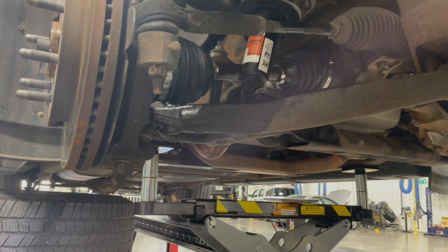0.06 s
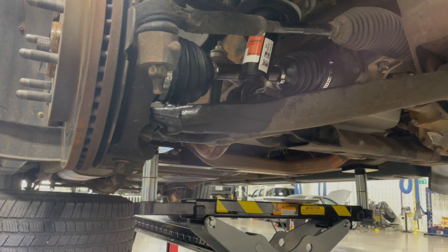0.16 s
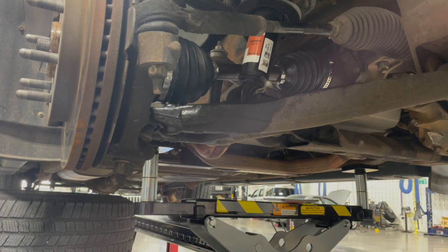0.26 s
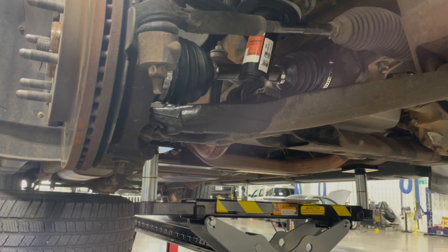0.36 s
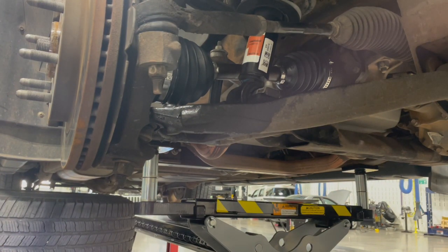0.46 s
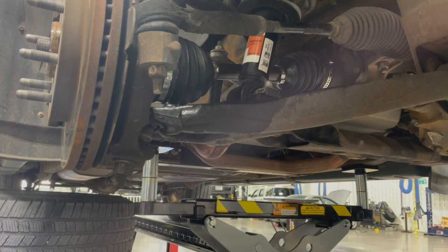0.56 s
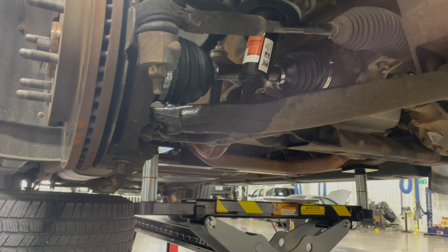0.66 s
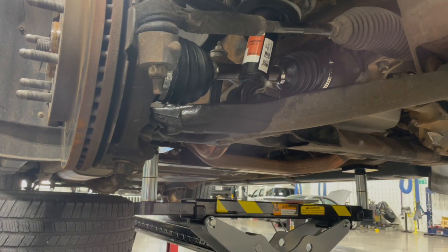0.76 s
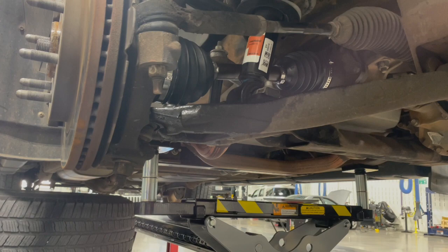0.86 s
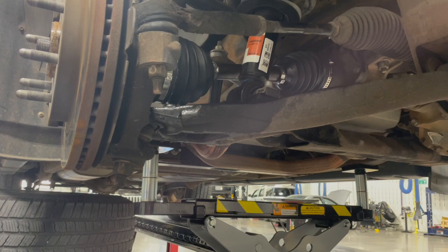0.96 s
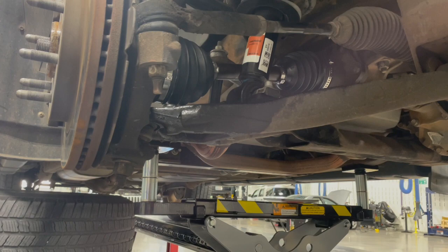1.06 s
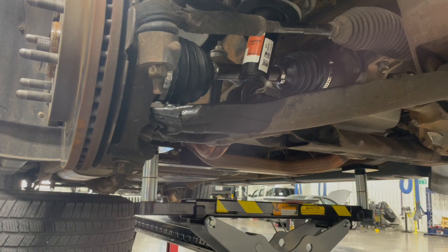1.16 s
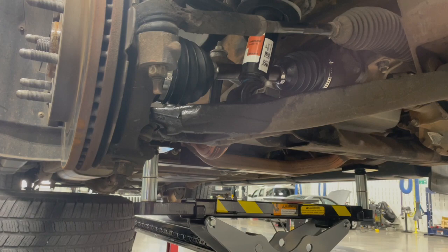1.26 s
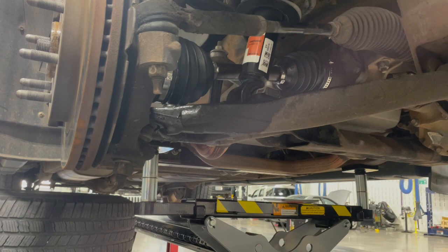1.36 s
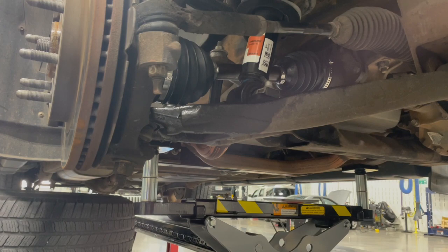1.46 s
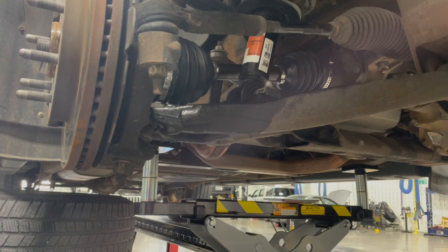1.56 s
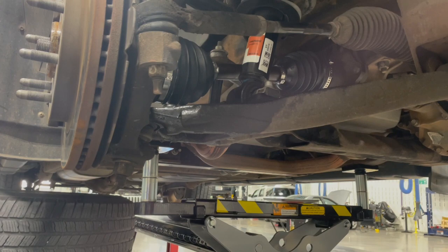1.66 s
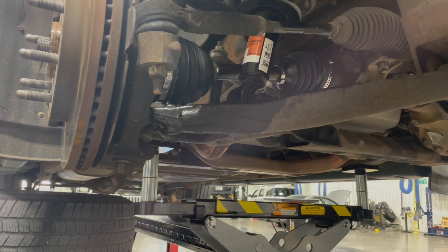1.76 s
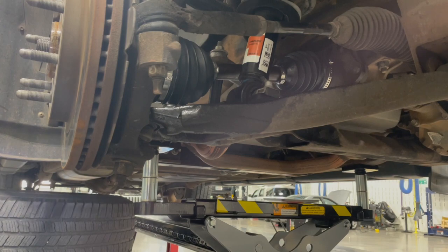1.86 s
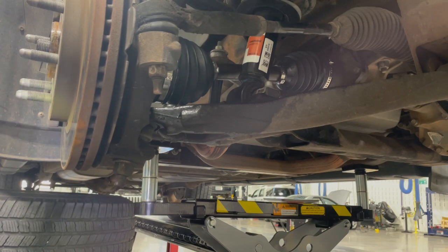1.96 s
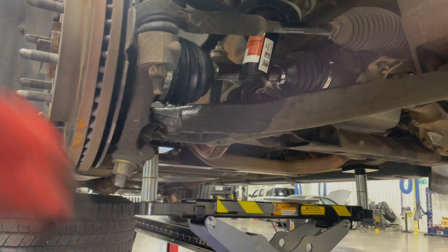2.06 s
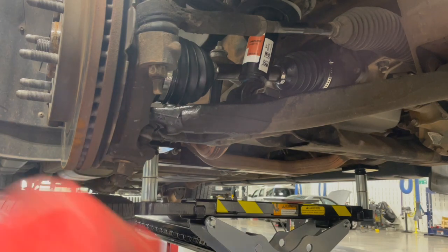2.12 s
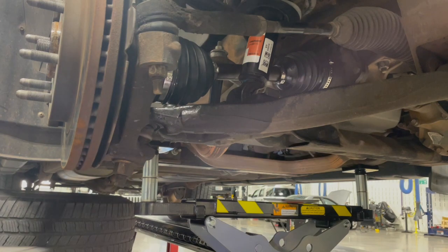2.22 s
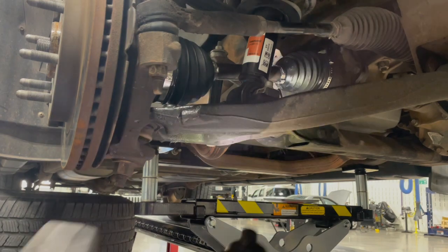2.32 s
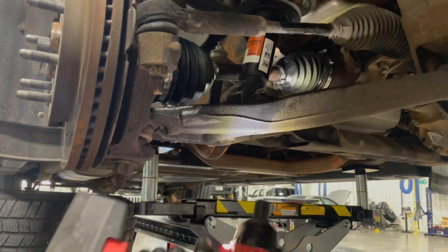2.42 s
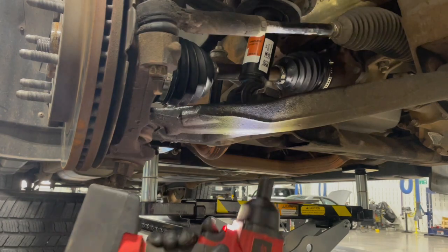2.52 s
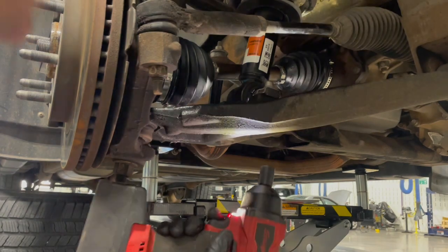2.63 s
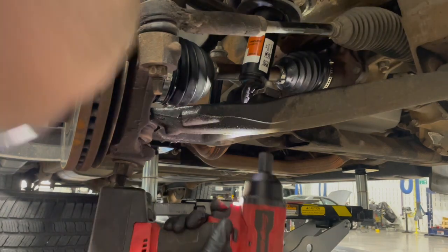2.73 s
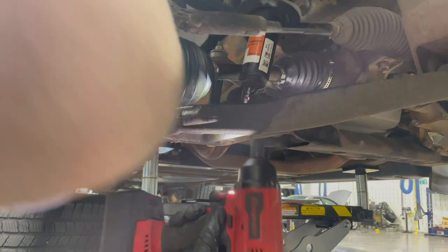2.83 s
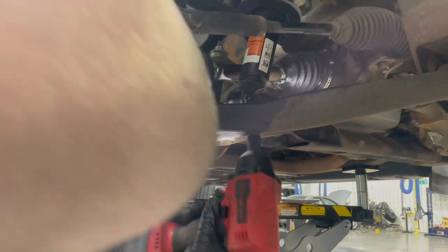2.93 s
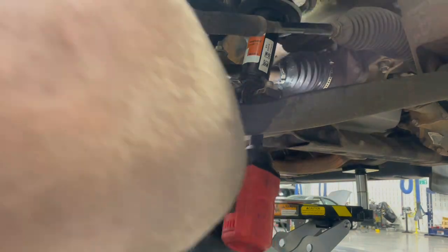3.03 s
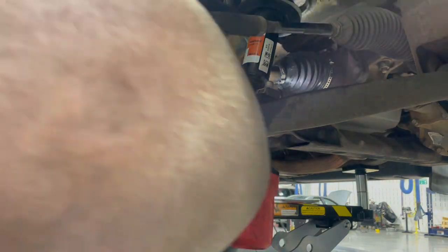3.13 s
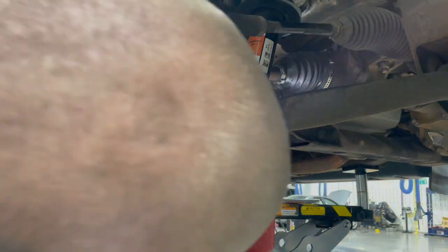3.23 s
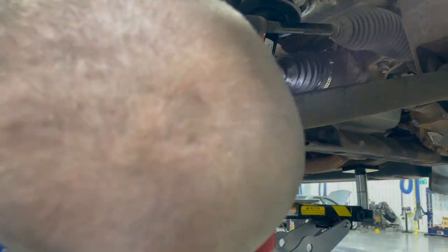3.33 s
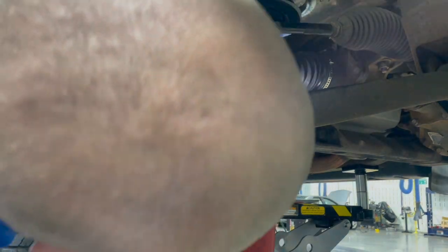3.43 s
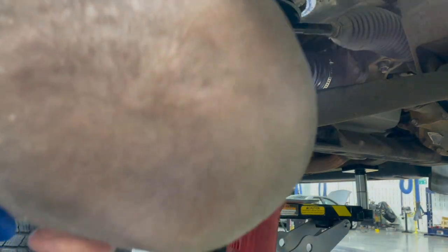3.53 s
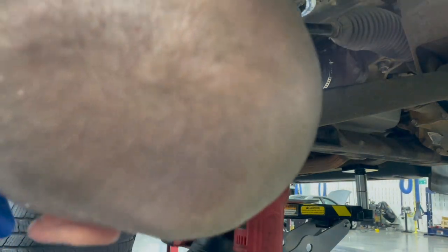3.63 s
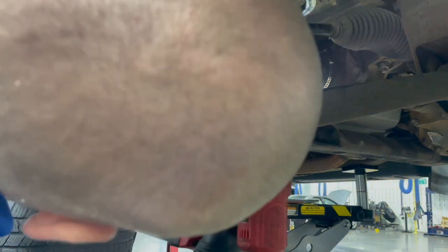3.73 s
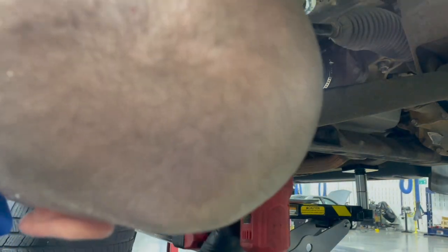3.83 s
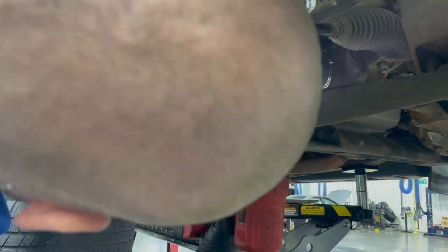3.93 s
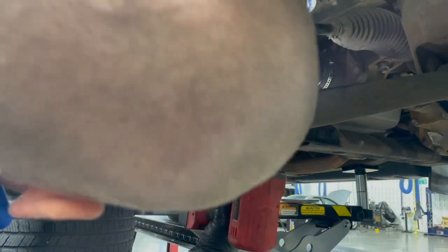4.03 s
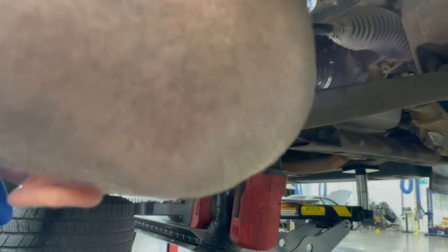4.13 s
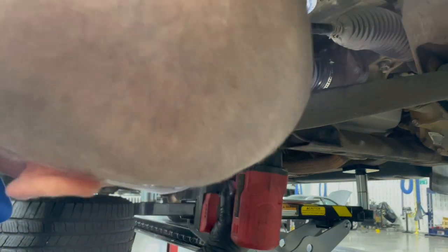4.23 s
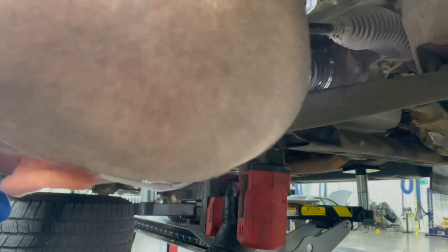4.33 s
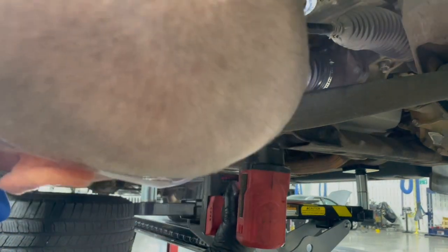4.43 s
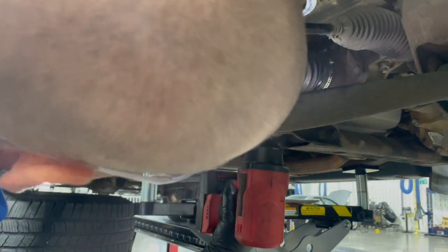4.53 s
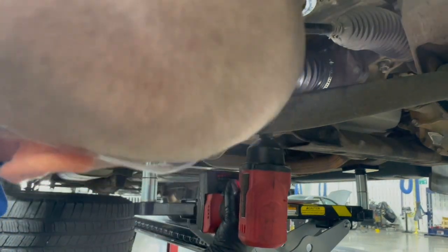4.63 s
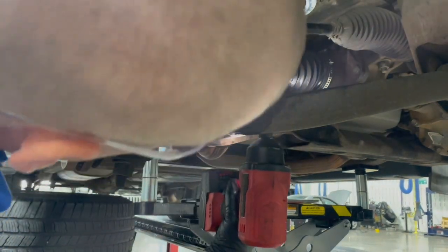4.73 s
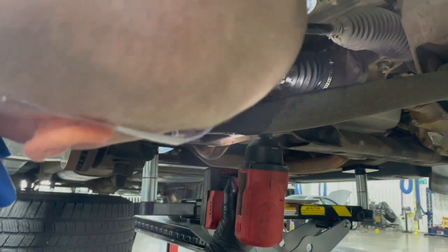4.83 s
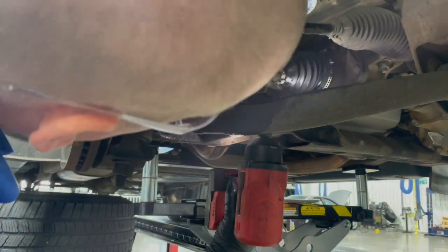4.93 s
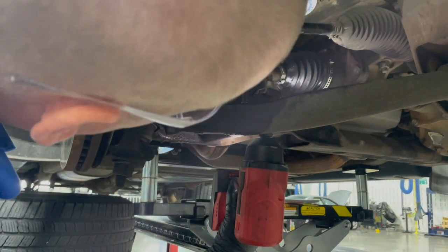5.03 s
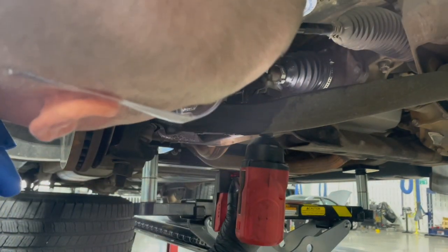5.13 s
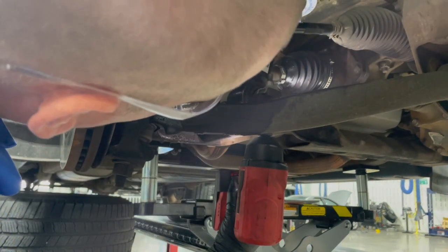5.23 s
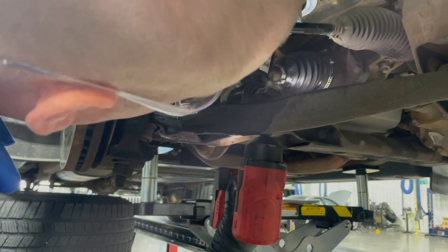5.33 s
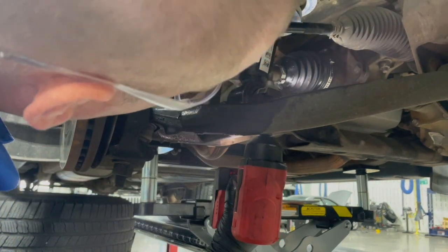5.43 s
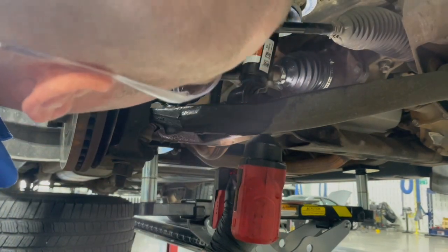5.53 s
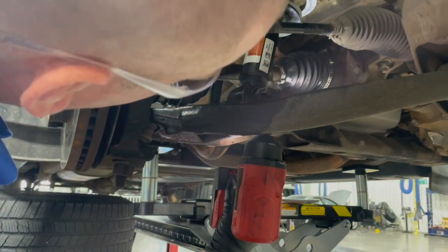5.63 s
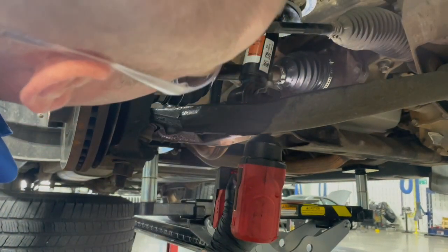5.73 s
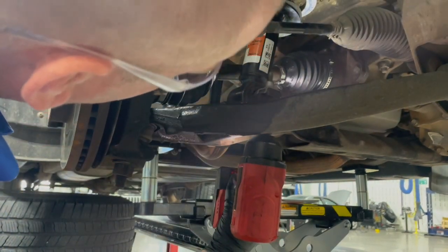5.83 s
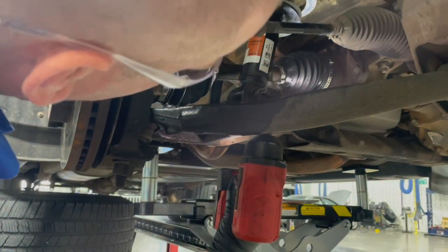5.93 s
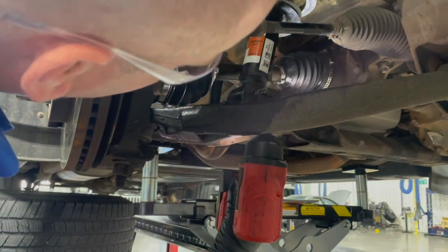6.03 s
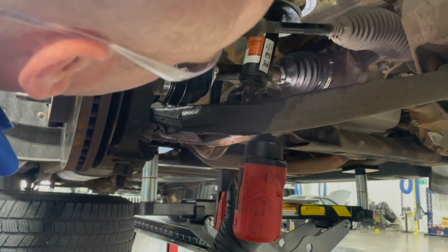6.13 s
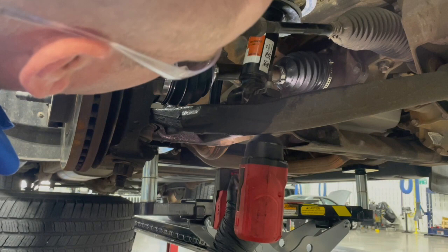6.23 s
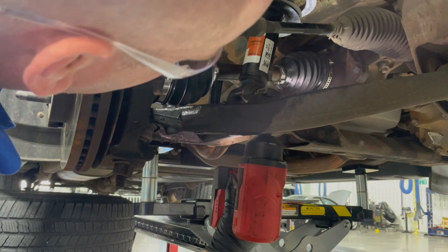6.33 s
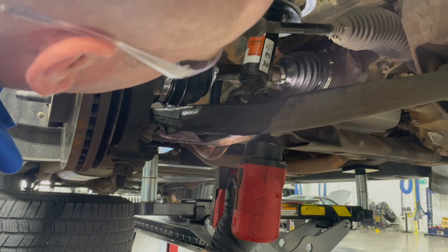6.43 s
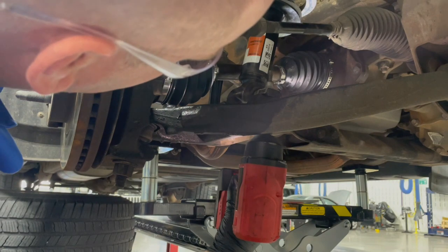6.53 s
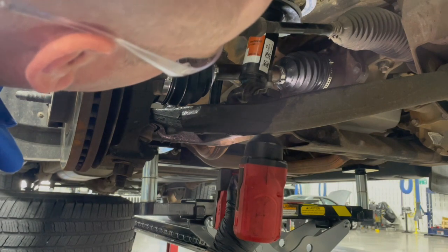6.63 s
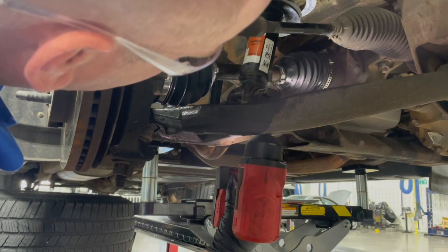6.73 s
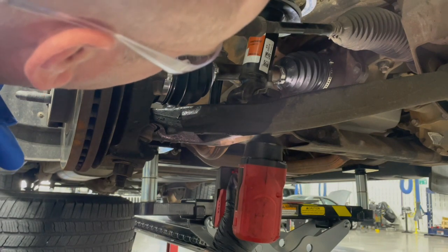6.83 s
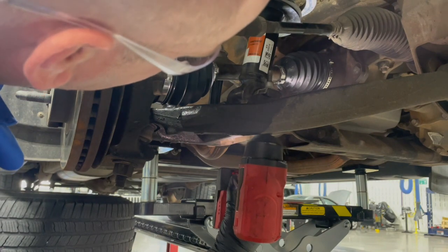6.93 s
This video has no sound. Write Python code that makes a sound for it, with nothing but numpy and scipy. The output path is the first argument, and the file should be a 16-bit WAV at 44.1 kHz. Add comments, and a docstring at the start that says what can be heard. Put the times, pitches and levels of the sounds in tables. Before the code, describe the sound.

Quiet workshop hum with faint ticks and scuffs, then a socket clunks onto steel and an impact wrench bursts into rapid metallic hammering.

```python
"""A cordless impact wrench on a suspension nut under a car on a lift in a workshop hall: it spins up, takes load
and hammers about 52 times a second, faster near the end; each blow is a clang, a noise burst and ringing modes.
Before it come ticks, clinks, scuffs and rustles of shaped noise and tones, then a socket knocked onto the nut.
The suspension steel rings, the underbody scatters each blow and the hall answers with a decaying noise tail."""
import sys
import numpy as np
from scipy import signal
from scipy.fft import rfft, irfft, next_fast_len
from scipy.io import wavfile
from scipy.ndimage import uniform_filter1d, map_coordinates

SR = 44100
rng = np.random.default_rng(int(sys.argv[2]) if len(sys.argv) > 2 else 0)


def inscribe(sig):
    """Save sig as 16-bit PCM at rate SR to the path in sys.argv[1].

    A 1-D sig is mono; a 2-D sig holds one channel per row.
    Samples are clipped to [-1, 1] before scaling.
    """
    pcm = np.round(np.clip(np.atleast_2d(sig).T, -1, 1) * 32767)
    wavfile.write(sys.argv[1], SR, pcm.astype(np.int16))


N = 307377
TIME = np.arange(N) / SR


def amp(db):
    """Decibels to gain."""
    return 10 ** (np.asarray(db) / 20)


def unit(x):
    """x at rms 1."""
    return x / np.sqrt(np.mean(x ** 2) + 1e-20)


def along(points, hz):
    """(Hz, value) points read on a log frequency axis."""
    f, v = np.transpose(points)
    return np.interp(np.log(hz + 1), np.log(f + 1), v)


def curves(rows, at=TIME):
    """Each column after the time, read at the given moments."""
    s, *cols = np.transpose(rows)
    return [np.interp(at, s, c) for c in cols]


def wobble(rate, count=N):
    """A smooth random curve, rate knots a second."""
    knots = rng.standard_normal(int(count * rate / SR) + 4)
    return map_coordinates(knots, [TIME[:count] * rate])


def swell(s, half_length_s):
    """A bell of height 1 around s seconds."""
    return np.exp(-((TIME - s) / half_length_s) ** 2)


def add(track, s, sound):
    """Mix a sound into a track at s seconds."""
    part = track[..., round(s * SR):][..., :sound.shape[-1]]
    part += sound[..., :part.shape[-1]]


def convolve(x, response):
    """x through an impulse response, mono or stereo."""
    return signal.fftconvolve(np.atleast_2d(x), np.atleast_2d(response), axes=1)[:, :N]


def colour(x, spectrum, size=2048):
    """x through a causal (minimum-phase) filter of energy 1 with the given spectrum."""
    gain = amp(along(spectrum, np.fft.rfftfreq(size, 1 / SR)))
    cepstrum = irfft(np.log(gain + 1e-6))
    # fold the cepstrum forward in time
    cepstrum[1:size // 2] *= 2
    cepstrum[size // 2 + 1:] = 0
    response = irfft(np.exp(rfft(cepstrum)))
    return convolve(x, response / np.linalg.norm(response))


# Likeness of the two ports. Each row: frequency in Hz, left-right correlation.
PORT_LIKENESS = [(60, 0.62), (150, 1), (380, 0.34), (950, 0.64), (2380, 0.67), (5980, 1), (15000, 0.52)]
# Phase between the ports. Each row: frequency in Hz, lead of the left port in radians.
PORT_LEAD = [(0, -1.5), (3790, 0.44), (5600, 1), (6200, 1), (6720, 4.5), (7750, 1.5), (10200, 1.3),
             (12500, -4), (14100, -2), (16100, -1)]


def noise(count):
    """White stereo noise as the two microphone ports hear it: partly alike, shifted in phase."""
    m = next_fast_len(count)
    hz = np.fft.rfftfreq(m, 1 / SR)
    turn = np.arccos(np.clip(along(PORT_LIKENESS, hz), -1, 1)) / 2
    shared, apart = rfft(rng.standard_normal((2, m))) * [np.cos(turn), np.sin(turn)]
    shift = np.exp(.5j * along(PORT_LEAD, hz))
    ports = np.array([(shared + apart) * shift, (shared - apart) / shift])
    return irfft(ports, m)[:, :count]


def sing(hz, width_hz):
    """A narrow band of noise, rms 1, that follows a pitch."""
    phase = 2 * np.pi * np.cumsum(hz) / SR
    in_phase = wobble(width_hz, len(hz)) * np.sin(phase)
    quadrature = wobble(width_hz, len(hz)) * np.cos(phase)
    return unit(in_phase + quadrature)


def ring(modes, spread, damping=1):
    """Stereo modal response of energy 1; modes lie spread radians either way between the ports."""
    t = np.arange(SR // 2) / SR
    ports = np.array([[1], [-1]]) * spread
    out = np.zeros((2, len(t)))
    for k, (hz, db, t60) in enumerate(modes):
        # the root of t60 makes db a level of energy
        fade = amp(db - 60 * damping * t / t60) / np.sqrt(t60)
        out += (-1) ** k * fade * np.sin(2 * np.pi * hz * t + ports * (-1) ** (k // 2))
    return out / np.linalg.norm(out[0])


def underbody(x, t60):
    """Dense short reflections from the car's floor pan and wheel well."""
    t = np.arange(SR // 5) / SR
    tail = noise(len(t)) * amp(-60 * t / t60) * (t > .002)
    return convolve(x, tail / np.linalg.norm(tail[0]))


# Decay of the hall. Each row: frequency in Hz, t60 in seconds.
HALL_T60 = [(200, 0.68), (3000, 0.79), (6000, 0.89), (13000, 1)]


def hall(x):
    """The workshop's noise-like tail, starting 12.5 ms late, longer in the treble as HALL_T60 sets."""
    hz, t, z = signal.stft(noise(SR), SR, nperseg=256)
    fade = amp(-60 * t / along(HALL_T60, hz)[:, None])
    tail = signal.istft(z * fade, SR, nperseg=256)[1]
    late = np.pad(tail / np.linalg.norm(tail[0]), ((0, 0), (SR // 80, 0)))
    return convolve(x, late)


# Spectrum of the hall's air. Each row: frequency in Hz, level in dB.
AIR_TONE = [(15, -55), (25, -18), (140, -6), (192, -6), (225, -3.5), (278, -11.5), (353, -7), (460, -19),
            (539, -17), (1050, -27.5), (3010, -31), (14000, -49)]


def hall_air():
    """The low, almost steady hum of the hall's air: coloured noise."""
    return amp(-63.0 + 0.04 * wobble(2.7)) * unit(colour(noise(N), AIR_TONE))


# Small ticks and scratches of tool and glove.
# Each row: start in seconds, level in dB, pitch in Hz, width in Hz, t60 in seconds.
TICK_ROWS = [(0.204, -42, 2600, 1340, 0.036), (.365, -44, 2435, 990, .04), (1.576, -56, 2300, 895, 0.1),
             (1.671, -50, 3530, 3500, 0.051), (2.064, -64, 3770, 2020, 0.074), (2.181, -57, 2450, 700, .07),
             (2.488, -53, 2160, 600, .06), (3.495, -61, 5160, 900, 0.045), (3.495, -59, 1390, 400, 0.044)]


def ticks():
    """A small contact rings briefly in one band."""
    t, out = np.arange(SR // 4) / SR, np.zeros(N)
    for s, db, hz, width_hz, t60 in TICK_ROWS:
        envelope = amp(db - 60 * t / t60) * (1 - np.exp(-t / 0.0006)) ** 2
        add(out, s, envelope * sing(np.full(len(t), hz), width_hz))
    return out


# Light clinks. Each row: start in seconds, level in dB, settled pitch in Hz, t60 in seconds.
CLINK_ROWS = [(0.2044, -24.5, 2220, 0.0077), (.3405, -49, 2300, 0.032), (0.3658, -30.5, 2080, 0.024)]


def clinks(bend=0.18):
    """Tiny damped clinks whose pitch sags at once, with the underbody's reflections."""
    t, out = np.arange(SR // 10) / SR, np.zeros(N)
    for s, db, hz, t60 in CLINK_ROWS:
        pitch_hz = hz * (1 + bend * np.exp(-t / 0.00098))
        phase = 2 * np.pi * np.cumsum(pitch_hz) / SR
        envelope = amp(db - 60 * t / t60) * (1 - np.exp(-t / 0.00036)) ** 3
        add(out, s, envelope * np.sin(phase))
    return out + amp(-3.5) * underbody(out, t60=0.12)


def patchy(x, depth_db):
    """Shifting folds and contact spots: resonances come and go across the spectrum."""
    z = signal.stft(x, nperseg=512)[2]
    field = rng.standard_normal(z.shape[1:])
    field = uniform_filter1d(uniform_filter1d(field, size=6, axis=0), size=14, axis=1)
    shaped = z * amp(depth_db * unit(field))
    return unit(signal.istft(shaped, nperseg=512)[1][:, :N])


# Treble of rubbing. Each row: frequency in Hz, level in dB.
SWISH_TONE = [(6500, -47), (8500, 4), (11000, 1.5), (13000, -4), (15500, -13)]
CATCHES_PER_S, CATCH_DB = 69, 2.5  # rubbing surfaces catch and let go
FOLD_DB = 2.5  # depth of the passing resonances


def rubbing(strokes, tone, grain_db):
    """Many tiny slips under strokes that rise, hold and die away."""
    body, treble = np.zeros((2, N))  # power envelopes
    for s, rise_s, hold_s, t60, db, treble_db in strokes:
        rise = np.exp(np.minimum(TIME - s, 0) / rise_s)
        stroke = rise * amp(-60 * np.maximum(TIME - s - hold_s, 0) / t60)
        body += (amp(db) * stroke) ** 2
        treble += (amp(treble_db) * stroke) ** 2
    grain = amp(grain_db * wobble(700) + CATCH_DB * wobble(CATCHES_PER_S))
    slips = patchy(noise(N) * grain, FOLD_DB)
    return np.sqrt(body) * colour(slips, tone) + np.sqrt(treble) * colour(slips, SWISH_TONE)


# A scuff. Each row: end of rise in seconds, rise in seconds, hold in seconds, t60 in seconds,
# body level in dB, treble level in dB.
SCUFF_STROKES = [(.448, 0.022, 0.017, 0.14, -33.5, -52)]
# Body of the scuff. Each row: frequency in Hz, level in dB.
SCUFF_BODY = [(180, -48), (300, -12.5), (528, -28), (835, -14.5), (1270, -27), (1360, -20), (1620, -12.5),
              (3530, -6), (5970, -10.5), (7500, -27), (9750, -81), (16500, -120)]


def scuff():
    """A scuff of rubbing surfaces sets the hall ringing."""
    direct = rubbing(SCUFF_STROKES, SCUFF_BODY, grain_db=2.0)
    return direct + amp(-7.0) * hall(direct)


# Rasps, squeaks and groans of sliding parts.
# Each row: start in seconds, length in seconds, start in Hz, glide in Hz, width in Hz, level in dB.
RASP_ROWS = [(0.543, 0.35, 3900, -250, 900, -64.5), (1.536, 0.3, 2600, 592.5, 680, -57),
             (1.74, 0.247, 3120, -73, 300, -60), (2.351, 0.46, 2100, 425.5, 350, -65),
             (2.69, .11, 2660, 200, 880, -46.5), (2.395, 0.44, 4920, 395, 640, -78),
             (2.685, .115, 4900, 200, 2600, -50), (3.394, 0.083, 10900, -22, 2100, -59.5),
             (4.129, 0.015, 8650, 50, 300, -22), (5.783, 0.53, 920, -20.5, 90, -48),
             (5.848, 0.22, 5640, -18, 60, -40.5), (6.484, 0.083, 930, 0, 95, -41.5),
             (6.632, 0.099, 923, 2, 20, -43)]


def rasps():
    """A sliding contact sings in one narrow, drifting band."""
    out = np.zeros(N)
    for s, length_s, start_hz, glide_hz, width_hz, db in RASP_ROWS:
        stroke = np.linspace(0, 1, round(length_s * SR))
        voice = sing(start_hz + glide_hz * stroke, width_hz)
        add(out, s, amp(db) * np.sin(np.pi * stroke) * voice)
    return out


# Clothing moving with the arms. Each row: end of rise in seconds, rise in seconds, hold in seconds,
# t60 in seconds, body level in dB, treble level in dB.
RUSTLE_STROKES = [(1.262, 0.0066, 0.015, 0.17, -52, -76), (1.378, 0.0025, .002, 0.097, -55, -85),
                  (1.674, 0.024, 0.0059, 0.38, -41.5, -61.5), (1.88, 0.051, 0.042, 0.44, -58, -64),
                  (2.046, .01, 0.0083, 0.44, -63, -65), (2.22, 0.043, 0.0093, 0.54, -57.5, -63.5),
                  (2.49, 0.093, 0.17, 0.22, -59, -61), (2.7, 0.031, 0.075, 0.083, -47.5, -54),
                  (2.87, .003, 0.0027, 0.092, -85, -66)]
# Body of the cloth. Each row: frequency in Hz, level in dB.
CLOTH_BODY = [(240, -49), (400, 0.5), (544, -9), (877, -4), (1210, -10), (2370, 2), (3870, -6.5),
              (4940, -5.5), (6470, -4), (7500, -25), (9750, -64), (16500, -120)]


def rustle():
    """Moving cloth: tiny slips between shifting folds."""
    return rubbing(RUSTLE_STROKES, CLOTH_BODY, grain_db=0.5)


# Dull bumps on the wheel hub. Each row: start in seconds, level in dB.
BUMP_ROWS = [(2.218, -30.5), (2.3, -49), (2.343, -44.5)]
# Spectrum of the hub. Each row: frequency in Hz, level in dB.
HUB_TONE = [(29, -45), (50, -27), (214, 2), (302, -8), (762, -11), (1070, -45), (1490, -22), (1830, -40),
            (2060, -23), (3000, -58), (3900, -70), (6600, -120)]


def soft_rise(t):
    """Onset of a soft contact, time constant 8.9 ms."""
    return 1 - np.exp(-t / 0.0089)


def bumps():
    """A hand bumps the hub: dull decaying noise."""
    t, out = np.arange(SR // 4) / SR, np.zeros(N)
    for s, db in BUMP_ROWS:
        add(out, s, soft_rise(t) * amp(db - 60 * t / 0.15))
    return colour(out * noise(N), HUB_TONE)


# Socket and tool bumping the steel. Each row: start in seconds, thud level in dB, scrape level in dB,
# scrape t60 in seconds, loss per rebound in dB.
KNOCK_ROWS = [(2.656, -42.5, -35.5, 0.058, 15), (3.224, -32, -26.5, 0.025, 15),
              (3.291, -48.5, -67, 0.024, 22), (3.414, -80, -56.5, 0.12, 13), (3.595, -40, -44, 0.14, 12),
              (3.613, -30, -44.5, 0.1, 5), (3.646, -28.5, -40.5, 0.078, 12), (3.707, -38.5, -40.5, 0.1, 8),
              (3.735, -21.5, -33, 0.075, 6.5), (3.89, -70, -39.5, 0.045, 31), (3.938, -65, -30, 0.032, 15),
              (4.134, -25, -32, 0.056, 19)]
# Spectrum of the scrape. Each row: frequency in Hz, level in dB.
SCRAPE_TONE = [(240, -23), (400, -22), (451, -21), (572, -35), (758, -20), (1170, -27.5), (2460, -12),
               (6090, -23), (7610, -37), (11000, -27), (14000, -43)]
# Suspension arm and knuckle. Each row: pitch in Hz, level in dB, t60 in seconds before damping.
STEEL_MODES = [(207, -12.5, 0.17), (297, -4, 0.18), (377, -4, 0.053), (453, 1, 0.15), (622, -10, 0.09),
               (765.3, 1, 0.31), (874, -5.5, 0.11), (982, -11.5, 0.14), (1232, -10.5, 0.06),
               (1448, 0, 0.095), (1697, -7, 0.073), (2003, -3, 0.092), (2390, 2, 0.48)]
ROCK_S = 0.017  # the socket rocks: rebounds follow a knock this far apart
LEAD_IN_S, LEAD_IN_DB = 0.011, -3  # the socket grazes the metal just before each knock
CLATTER_DB = -15  # the steel's answer to the scraping socket


def knocks(thud_t60=0.088, ring_db=23.0, count=3):
    """The socket scrapes and rocks its way onto the nut: thuds, scrapes and ringing steel."""
    t = np.arange(SR // 4) / SR
    taps, pushes, scrapes = np.zeros((3, N))
    rise = soft_rise(t)
    for s, db, scrape_db, length_s, loss_db in KNOCK_ROWS:
        # a longer, softer contact spares the high modes
        touch = np.exp(-(t[:100] / (0.0029 * length_s) - 2) ** 2)
        scrape = rise * amp(scrape_db - 60 * t / length_s)
        add(scrapes, s - LEAD_IN_S, amp(LEAD_IN_DB) * scrape)
        for k in range(count):
            at, size = s + k * ROCK_S, amp(-k * loss_db)
            add(taps, at, size * amp(db + ring_db) * touch / touch.sum())
            add(pushes, at, size * rise * amp(db - 60 * t / thud_t60))
            add(scrapes, at, size * scrape)
    clatter = amp(CLATTER_DB) * scrapes * rng.standard_normal(N)
    steel = convolve(taps + clatter, ring(STEEL_MODES, spread=0.34, damping=2))
    thud = colour(pushes * noise(N), [(50, -32.0), (170, -1.5), (430, 0), (650, -9.5), (3000, -43)])
    return steel + thud + colour(scrapes * noise(N), SCRAPE_TONE)


# The arm jolts under a knock and under the hammering. Each row: start in seconds, level in dB.
JOLT_ROWS = [(3.23, -36), (4.325, -30.5), (4.465, -31.5), (4.918, -37), (4.996, -37), (5.325, -31.5),
             (5.634, -32.5), (5.691, -39.5)]
# Each row: pitch in Hz, level in dB, t60 in seconds.
ARM_MODES = [(307, -9.5, 0.15), (437, 3, 0.049), (461, 2.5, 0.12)]


def jolts(rise_s=0.0036):
    """The suspension arm answers with a low, hollow knock."""
    t, out = np.arange(SR // 4) / SR, np.zeros(N)
    modes = sum(amp(db - 60 * t / t60) * np.sin(2 * np.pi * hz * t) for hz, db, t60 in ARM_MODES)
    knock = (1 - np.exp(-t / rise_s)) * modes
    for s, db in JOLT_ROWS:
        add(out, s, amp(db) * knock)
    return out


# Rotor and gear lines. Each row: multiple of rotor speed, level in dB.
ROTOR_ORDERS = [(1, -3.5), (2, -6), (4, 4.5), (6, -7), (8, -3.5)]
# Spectrum of the gear noise. Each row: frequency in Hz, level in dB.
GEAR_TONE = [(80, -44), (155, -13), (257, -12.5), (462, -10), (660, -13), (867, -2.5), (1050, -12.5),
             (1700, -4), (2000, -14), (2690, -2), (5840, -10.5), (7510, -21.5), (11000, -12), (15000, -39)]
# How the tool's housing radiates the lines. Each row: frequency in Hz, level in dB.
HOUSING_TONE = [(100, -56), (450, -3), (620, -20), (870, 6.5), (1150, -30), (1700, 1.5), (2100, -30),
                (2700, 6), (3200, 7), (3700, 1), (4300, -15), (6000, -20), (7500, -34)]
# Drive whistles. Each row: multiple of rotor speed away from the switching rate, level in dB at top speed.
WHISTLE_ROWS = [(0, -46), (3, -38.5)]
# The hammer spring winds up: time in seconds, half length in seconds, added whine in dB, added gear noise in dB.
SPRING_WIND_UP = (4.143, 0.0163, 0.63, 9.5)
# the motor accelerates evenly from the trigger, easing into its top speed
TRIGGER_S, ROTOR_HZ_PER_S, ROTOR_TOP_HZ = 3.927, 3450, 458.4
LOUD_FROM_HZ = 334  # rotor speed at which the running levels are reached
WHINE_DB, WHINE_DB_PER_OCTAVE = -27.5, 24
GEAR_DB, GEAR_DB_PER_OCTAVE = -26.5, 12
LOAD_SAG = 0.0252  # share of its speed that the rotor loses to the spring
MOTOR_FADE_DB_PER_S = 212  # once the hammering has begun
ROTOR_JITTER, WHINE_ROUGH = .003, 0.35  # unsteadiness of the rotor's speed and of the whine's level
TOOTH_DB = 2  # the gear teeth add a cluster of higher multiples
PLANET_RATIO, PLANET_DEPTH = .22, .35  # planet gears circle at this share of rotor speed, splitting lines
SWITCH_HZ = 10000  # the motor's drive switches at this rate and whistles around it


def motor():
    """The rotor whines upward through the housing's resonances, louder with speed, until the spring loads it."""
    ramp_hz = np.maximum(ROTOR_HZ_PER_S * (TIME - TRIGGER_S), 1)
    rotor_hz = ramp_hz / (1 + (ramp_hz / ROTOR_TOP_HZ) ** 10) ** (1 / 10)
    octaves = np.minimum(np.log2(rotor_hz / LOUD_FROM_HZ), 0)
    s, half_s, strain_db, grind_db = SPRING_WIND_UP
    rotor_hz = rotor_hz * (1 - LOAD_SAG * swell(s + half_s, 3 * half_s))
    whine_db = WHINE_DB + WHINE_DB_PER_OCTAVE * octaves + strain_db * swell(s, half_s)
    gear_db = GEAR_DB + GEAR_DB_PER_OCTAVE * octaves + grind_db * swell(s, half_s)
    angle = 2 * np.pi * np.cumsum(rotor_hz * (1 + ROTOR_JITTER * wobble(150))) / SR

    whine, whistle = np.zeros((2, 2, N))
    for k, db in ROTOR_ORDERS + [(k, TOOTH_DB) for k in range(11, 14)]:
        line = np.sin(k * angle + rng.normal(0, 0.54, (2, 1)))
        whine += amp(db + along(HOUSING_TONE, k * rotor_hz)) * line
    whine *= 1 + WHINE_ROUGH * wobble(200)
    whine *= 1 + PLANET_DEPTH * np.cos(PLANET_RATIO * angle)
    mesh = unit(colour(noise(N) * (1 + 0.41 * np.cos(angle)), GEAR_TONE))
    for k, db in WHISTLE_ROWS:
        phase = 2 * np.pi * SWITCH_HZ * TIME + k * angle
        whistle += amp(db) * np.sin(phase + rng.normal(0, 1, (2, 1)))
    whistle *= rotor_hz / ROTOR_TOP_HZ
    fade = amp(-MOTOR_FADE_DB_PER_S * np.maximum(TIME - SPEED_ROWS[0][0], 0))
    return (TIME > TRIGGER_S) * fade * (amp(whine_db) * whine + amp(gear_db) * mesh + whistle)


# Hammer speed. Each row: time in seconds, rate in blows per second.
SPEED_ROWS = [(4.173, 38.74), (4.231, 47.43), (4.458, 51.53), (4.782, 50.93), (6.138, 52.19),
              (6.212, 51.59), (6.547, 51.23), (6.612, 57.55), (6.97, 58.05)]


def blow_times():
    """Moments in seconds at which the turning hammer completes a blow."""
    turns = np.cumsum(curves(SPEED_ROWS)[0] * (TIME >= SPEED_ROWS[0][0])) / SR
    times = np.interp(np.arange(int(turns[-1]) + 1), turns, TIME)
    return np.maximum(times, SPEED_ROWS[0][0])


def blow_shape(power, db):
    """Gain curve from a power envelope, rms 1 over the hammering before db is applied."""
    return amp(db) * np.sqrt(power / np.mean(power[TIME > SPEED_ROWS[0][0]]))


# Blows that glance off or catch very hard. Each row: time in seconds, strength in dB against an ordinary blow.
ODD_BLOW_ROWS = [(4.174, 2), (4.22, 3), (4.242, 2), (4.385, 2), (4.425, -4), (4.483, 1.5), (4.541, -2.5),
                 (4.64, -3.5), (4.697, 3), (4.737, 3), (4.835, -2.5), (4.913, -3), (5.207, 2.5), (5.245, 3),
                 (5.265, 3), (5.285, -3), (5.382, -6.5), (5.401, 3), (5.498, 3.5), (5.517, -4),
                 (5.536, 3.5), (5.575, 2.5), (5.614, -3), (5.633, -5.5), (5.652, 1), (5.671, .5),
                 (5.69, .5), (5.711, 4), (5.749, -7), (5.769, -4), (5.787, 3), (5.826, 4), (5.865, 2.5),
                 (5.884, 3), (5.903, 1), (5.922, -1), (5.942, -1.5), (5.961, 4), (6.038, -6.5),
                 (6.057, 3.5), (6.096, 3.5), (6.133, 2), (6.191, 2), (6.211, -3), (6.23, -2.5), (6.25, -3),
                 (6.269, -2.5), (6.366, 4.5), (6.385, 2), (6.463, 3.5), (6.483, -4.5), (6.502, 4.5),
                 (6.522, -2.5), (6.561, -4), (6.58, 1.5), (6.598, -7), (6.616, -2), (6.685, -3),
                 (6.702, 2.5), (6.72, 3), (6.771, 3), (6.84, 2)]
REBOUND = 0.18  # share of a blow's excess or loss that the next makes up; hard and weak alternate, fading
HARDEST_DB = 0  # the most that the spring can add to an ordinary blow


def strengths(times, chance_db):
    """dB of each blow: what one blow fails to spend goes into the next, and the other way round."""
    odd_db = np.zeros(len(times))
    for s, db in ODD_BLOW_ROWS:
        odd_db[np.argmin(abs(times - s))] = db
    ordinary_db = signal.lfilter([1], [1, REBOUND], odd_db + chance_db)
    return np.where(odd_db != 0, odd_db, np.minimum(ordinary_db, HARDEST_DB))


# The anvil's hard, hand-damped clang. Each row: pitch in Hz, level in dB, t60 in seconds.
CLANG_MODES = [(1532, -9.5, 0.013), (2512, 1, 0.0088), (2774, 3, 0.0087), (6320, -6, 0.016)]
CLANG_VARY_DB, CLANG_DETUNE = 2.5, 0.039  # the jaws never meet at quite the same spot


def clang_once(rise_s=0.00083):
    """One clang of the anvil; every mode comes out a little different each time."""
    t = np.arange(SR // 30) / SR
    modes = np.zeros((2, len(t)))
    for hz, db, t60 in CLANG_MODES:
        louder, sharper, turn = rng.standard_normal(3)
        phase = 2 * np.pi * (hz * (1 + CLANG_DETUNE * sharper) * t + turn)
        ports = np.array([[.5], [-.5]]) * along(PORT_LEAD, hz)
        modes += amp(db + CLANG_VARY_DB * louder - 60 * t / t60) * np.sin(phase + ports)
    return unit(modes * (1 - np.exp(-t / rise_s)))


def strikes(contact_s=0.00075, chatter_t60=0.036, uneven_db=-0.4, window_s=0.003):
    """Every blow as contact and chatter power, a single-sample kick and a clang."""
    times = blow_times()
    chance = rng.standard_normal((len(times), 3))
    sizes = amp(strengths(times, uneven_db * chance[:, 0]))
    t = np.arange(SR // 8) / SR - window_s
    contact, chatter, kicks = np.zeros((3, N))
    clang = np.zeros((2, N))
    for s, size, (_, late, longer) in zip(times, sizes, chance):
        width = contact_s * np.exp(.13 * longer)
        peak_s = s + 0.00012 * late
        begun = t > -width
        add(contact, peak_s - window_s, size ** 2 * begun * np.exp(-(t / width) ** 2))
        kicks[min(round((peak_s - width) * SR), N - 1)] = size
        add(clang, peak_s - width, size * clang_once())
        # even a glancing blow rattles the socket
        add(chatter, peak_s - window_s, size ** 1.6 * begun * amp(-60 * t / chatter_t60) ** 2)
    return contact, chatter, kicks, clang


WELL_ECHO_S, WELL_ECHO_DB = 0.0053, -10  # the wheel well throws the clang back


def anvil(clang, force_db, clang_db=-3):
    """The clangs at hammering level, with their echo from the wheel well."""
    clang = clang * amp(force_db + clang_db) / np.std(clang[:, TIME > SPEED_ROWS[0][0]])
    add(clang, WELL_ECHO_S, amp(WELL_ECHO_DB) * clang)
    return clang


# Spectrum of a blow's contact. Each row: frequency in Hz, level in dB.
CRACK_TONE = [(30, -64), (150, -40), (600, -18), (1200, -42.5), (1530, -2.5), (1850, -25), (2500, 2),
              (2900, -4), (3300, 2), (5400, -6), (6150, 1.5), (7400, -10.5), (9200, -15), (13000, -7.5),
              (16000, -26)]


def cracks(contact, force_db, crack_db=-3):
    """The brief grinding contact of each blow: a burst of coloured noise."""
    return colour(blow_shape(contact, force_db + crack_db) * noise(N), CRACK_TONE)


# Spectrum of the socket's chatter. Each row: frequency in Hz, level in dB.
CHATTER_TONE = [(30, -91), (200, -51), (900, -8.5), (1500, -15), (1850, -10), (2700, -5.5), (6200, 0.5),
                (7400, -13.5), (9000, 1.5), (12500, -6), (14700, -15.5), (15700, -23)]
CHATTER_GRAIN_DB = 3


def socket_chatter(chatter, level_db):
    """The socket chatters after a blow in a run of tiny separate contacts."""
    grains = unit(noise(N) * amp(CHATTER_GRAIN_DB * wobble(1500)))
    return colour(blow_shape(chatter, level_db) * grains, CHATTER_TONE)


# Spectrum of the scattered tail. Each row: frequency in Hz, level in dB.
SCATTER_TONE = [(30, -66), (120, -32.5), (300, -19.5), (650, -12), (1500, -5), (1900, -3), (2650, -1.5),
                (3300, -3.5), (6000, -13), (7400, -38), (9300, -21), (13000, -30), (16000, -36)]


def scatter(kicks, force_db, t60=0.39, scatter_db=-11, buzz_db=-13):
    """Some body panels return each blow alike, loose ones buzz anew."""
    buzz = signal.lfilter([1], [1, -amp(-120 / (t60 * SR))], kicks)  # power envelope
    panels = underbody(blow_shape(kicks ** 2, force_db + scatter_db), t60)
    loose = blow_shape(buzz, force_db + buzz_db) * noise(N)
    return colour(panels + loose, SCATTER_TONE)


# Socket and anvil. Each row: pitch in Hz, level in dB, t60 in seconds.
SOCKET_MODES = [(2507, -2, 0.32), (2670, -10, 0.42), (3310, -2, 0.064), (3655, 0, 0.2), (3680, 4, 0.26),
                (4000, 2.5, 0.05), (4770, -0.5, 0.07), (5200, -2, 0.036), (5630, -2.5, 0.16),
                (6130, -1.5, 0.037)]
SEAT_SHIFT_S, SEAT_SHIFTS_PER_S = .00008, 25


def socket_ring(contact, force_db, socket_db=-10):
    """The socket rings on; it shifts on the nut, so its ring wavers in pitch."""
    drive = blow_shape(contact, force_db + socket_db) * rng.standard_normal(N)
    steady = convolve(drive, ring(SOCKET_MODES, spread=0.16))
    at = (TIME + SEAT_SHIFT_S * wobble(SEAT_SHIFTS_PER_S)) * SR
    return np.array([map_coordinates(port, [at]) for port in steady])


# The thread binds and the steel sounds again. Each row: time in seconds, half length in seconds, level in dB.
BIND_ROWS = [(5.62, 0.071, -41), (5.926, 0.021, -40), (6.58, 0.083, -49), (6.776, 0.11, -36)]
# the tight nut passes the blows into the steel, less and less as it loosens
TIGHT_DB, LOOSENS_S, LOOSEN_DB_PER_S, LOOSE_DB = -34.5, 4.72, 18.5, -49


def grip():
    """dB at which the blows reach the suspension through the nut."""
    tight = amp(TIGHT_DB - LOOSEN_DB_PER_S * np.maximum(TIME - LOOSENS_S, 0))
    binds = sum(amp(db) * swell(s, half_s) for s, half_s, db in BIND_ROWS)
    return 10 * np.log10(tight ** 2 + binds ** 2 + amp(LOOSE_DB) ** 2)


def suspension(contact, kicks, hum_db=-3):
    """Blows twist the nut one way, so the steel hums where multiples of their rate meet its modes."""
    steel_db = grip()
    twist = blow_shape(kicks ** 2, steel_db + hum_db)
    twist = twist + blow_shape(contact, steel_db) * rng.standard_normal(N)
    drive = colour(twist, [(40, -31.5), (280, -1), (470, -0.5), (760, -3.5), (1000, 9.5), (2400, -2.0), (4000, 4.0)])
    # pressing the tool onto the nut damps the metal
    return convolve(drive, ring(STEEL_MODES, spread=.35, damping=1.7))


# The drone: time in seconds, half length in seconds, level in dB before colouring.
DRONE_SWELL = (6.83, 0.15, -44)
# Each row: frequency in Hz, level in dB.
DRONE_COLOUR = [(150, -37.5), (340, 1), (580, 4), (820, -4), (1100, -29), (3000, -50)]


def arm_drone(kicks):
    """Near the end the blows shake the whole arm, which drones at multiples of their rate."""
    s, half_s, db = DRONE_SWELL
    return swell(s, half_s) * colour(blow_shape(kicks ** 2, db), DRONE_COLOUR)


# The loosened nut. Each row: pitch in Hz, level in dB, t60 in seconds.
NUT_MODES = [(2050, -4, .025), (4450, 0, .012), (4950, 1, .011), (5604, -3.5, .2)]
# Its rattle: time in seconds, half length in seconds, drive level in dB.
NUT_SWELL = (6.84, .14, -28.5)


def nut_rattle(contact):
    """The loosened nut rattles along near the end: its modes, driven by the contacts."""
    s, half_s, db = NUT_SWELL
    drive = swell(s, half_s) * blow_shape(contact, db) * rng.standard_normal(N)
    return convolve(drive, ring(NUT_MODES, spread=0.36))


# Each row: time in seconds, blow strength in dB before each part's offset, chatter in dB against the strength.
FORCE_ROWS = [(4.17, -23, -4.5), (4.7, -23.5, -3), (5.2, -24, -3), (5.7, -26.5, -5.5), (6.2, -26.5, -2.5),
              (6.5, -27, -4.5), (6.64, -26, -4), (6.77, -24.5, 0), (6.97, -25.5, 0.5)]


def hammer():
    """Each blow is a hard clang with a brief grinding contact, then the socket chatters and the steel rings on."""
    contact, chatter, kicks, clang = strikes()
    force_db, chatter_db = curves(FORCE_ROWS)
    blows = anvil(clang, force_db) + cracks(contact, force_db)
    blows = blows + socket_chatter(chatter, force_db + chatter_db)
    answer = scatter(kicks, force_db) + socket_ring(contact, force_db) + suspension(contact, kicks)
    return blows + answer + arm_drone(kicks) + nut_rattle(contact)


# Low thumps. Each row: start in seconds, level in dB.
THUMP_ROWS = [(5.555, -31), (6.093, -34), (6.718, -29), (6.9615, -14.5)]


def thumps(start_hz=800, fall_s=0.0024, t60=0.074):
    """Low thumps of falling pitch: the higher pitches arrive first, the lowest trail behind."""
    t, out = np.arange(SR // 8) / SR, np.zeros(N)
    sweep = np.sin(2 * np.pi * start_hz * fall_s * np.log1p(t / fall_s))
    for s, db in THUMP_ROWS:
        add(out, s, amp(db - 60 * t / t60) * (1 - np.exp(-t / 0.0021)) * sweep)
    return out


def scene():
    """Tool and handling with the hall's answer, over its air; small sounds lie slightly to the left."""
    small = ticks() + clinks() + scuff() + rasps() + rustle()
    handling = small * amp([[.7], [-.7]]) + bumps() + knocks()
    tool = jolts() + motor() + hammer()
    answer = hall(amp(-11.0) * tool + amp(-18.5) * handling)
    return hall_air() + handling + tool + answer + thumps()


# Balance of the ports. Each row: frequency in Hz, left minus right in dB.
PORT_TILT = [(60, -2), (120, 2.5), (240, 1), (480, 3), (950, 2), (1890, -0.5), (3770, 3.5), (7520, 1),
             (15000, -0.5)]
TOP_HZ = 16100


def record(dry):
    """The two microphone ports hear each band a little unequally; nothing above the band limit is kept."""
    m = next_fast_len(N + SR // 4)
    hz = np.fft.rfftfreq(m, 1 / SR)
    balance = amp(along(PORT_TILT, hz) * np.array([[.5], [-.5]]))
    return irfft(rfft(dry, m) * balance * (hz < TOP_HZ), m)[:, :N]


dry = scene()
out = record(dry)
inscribe(out)
```